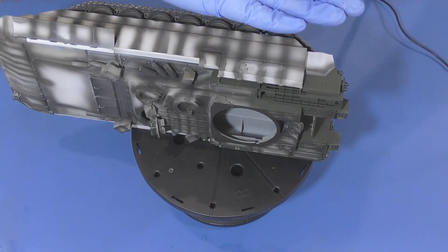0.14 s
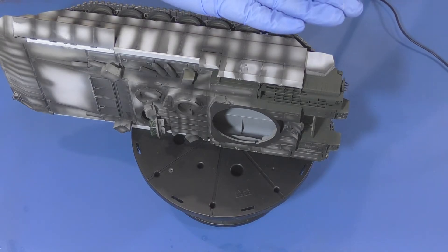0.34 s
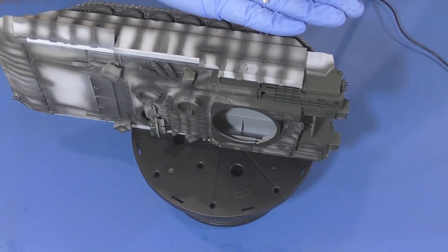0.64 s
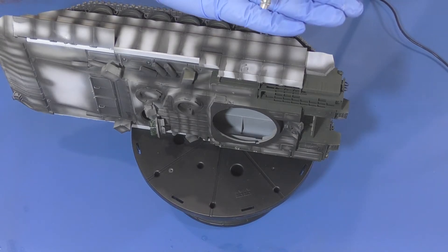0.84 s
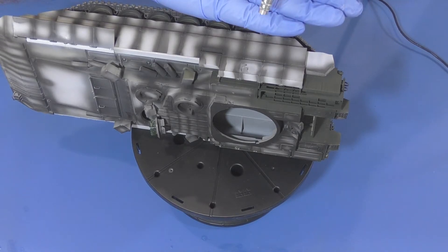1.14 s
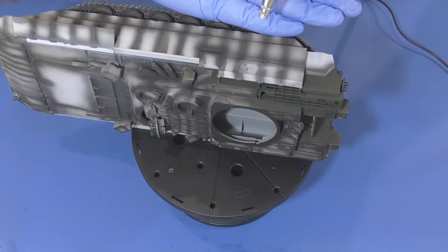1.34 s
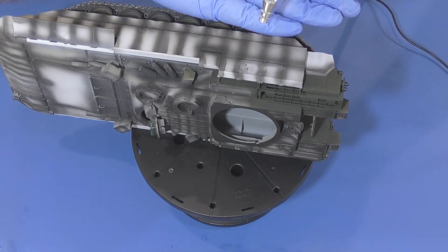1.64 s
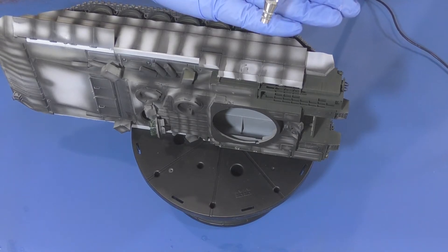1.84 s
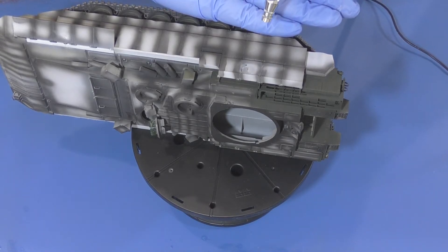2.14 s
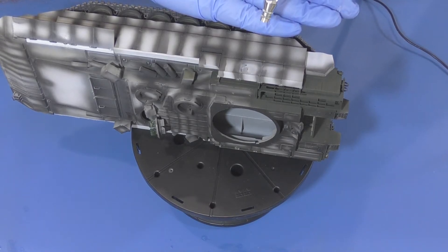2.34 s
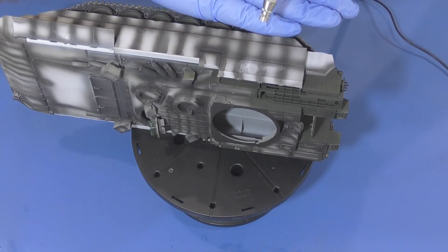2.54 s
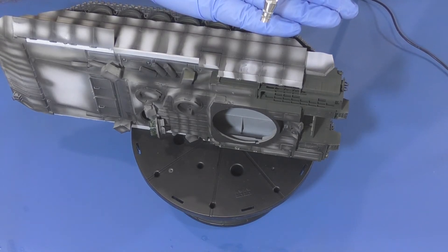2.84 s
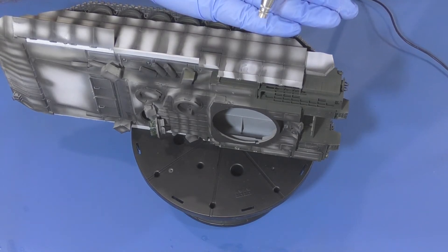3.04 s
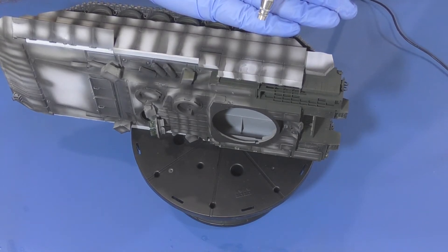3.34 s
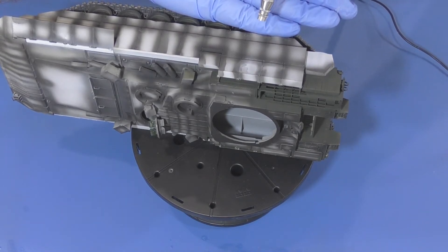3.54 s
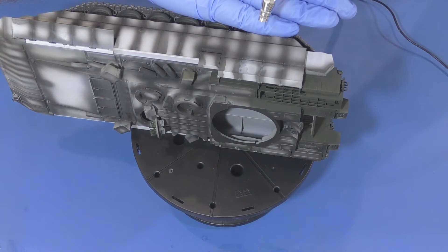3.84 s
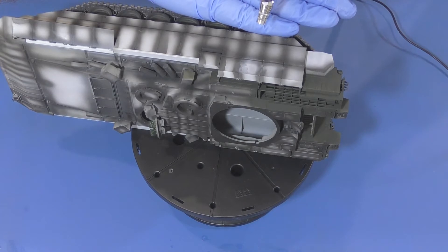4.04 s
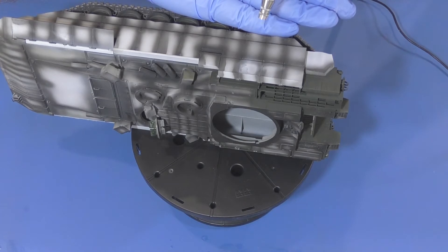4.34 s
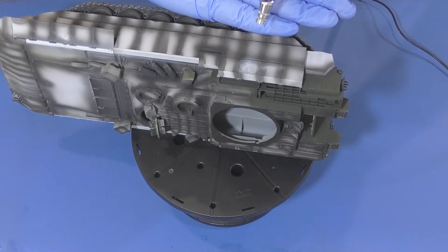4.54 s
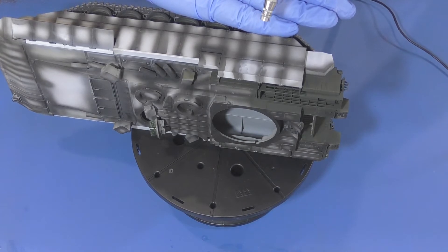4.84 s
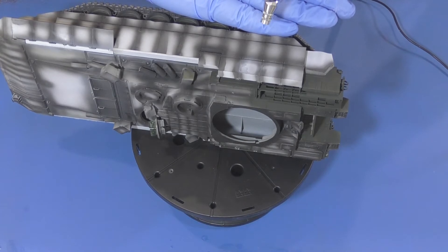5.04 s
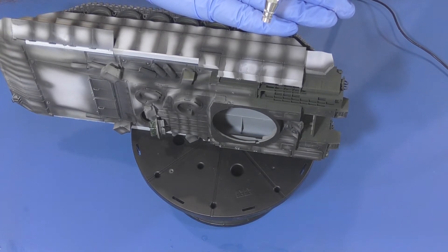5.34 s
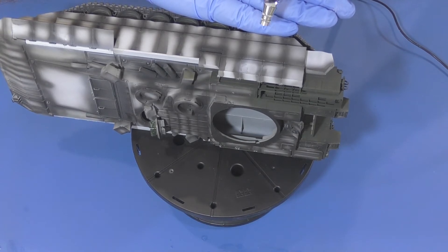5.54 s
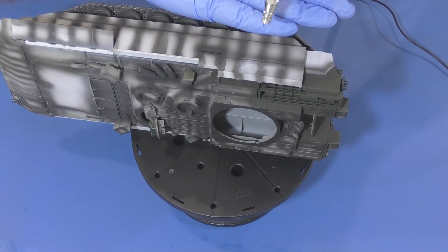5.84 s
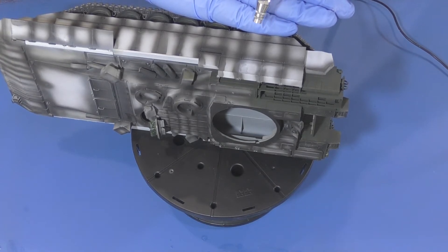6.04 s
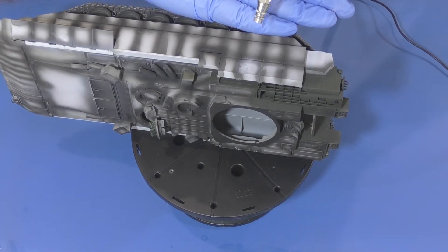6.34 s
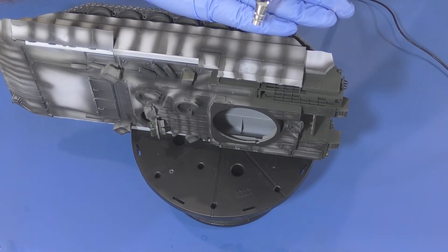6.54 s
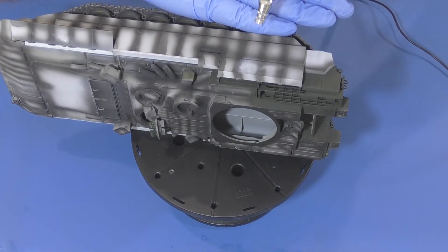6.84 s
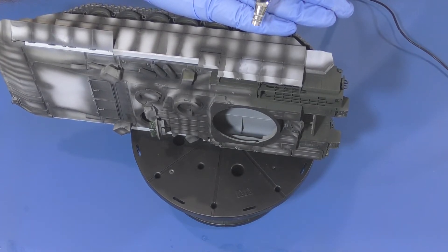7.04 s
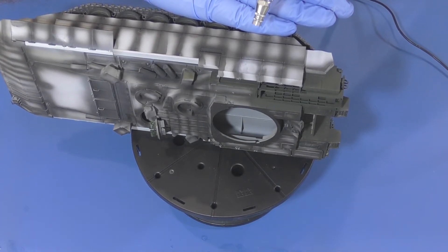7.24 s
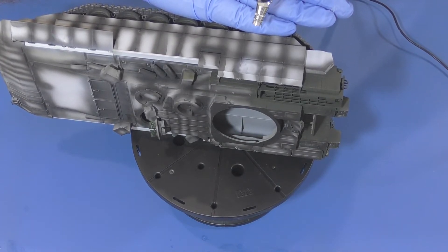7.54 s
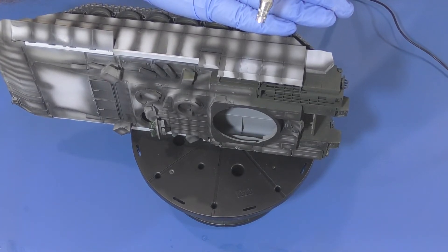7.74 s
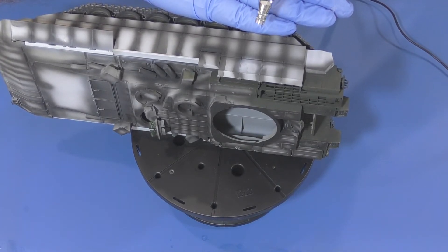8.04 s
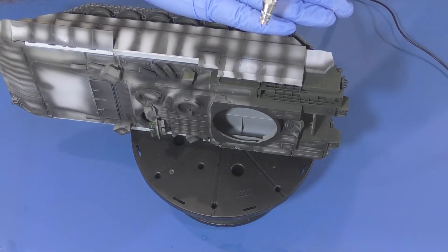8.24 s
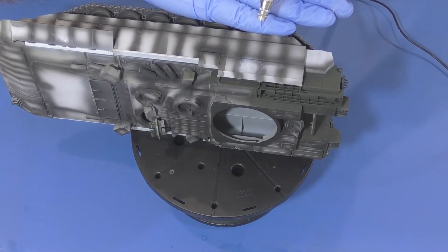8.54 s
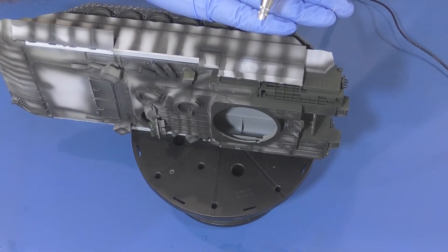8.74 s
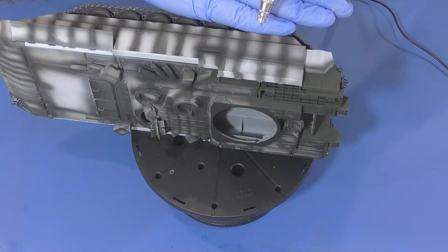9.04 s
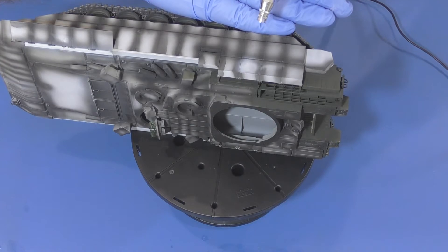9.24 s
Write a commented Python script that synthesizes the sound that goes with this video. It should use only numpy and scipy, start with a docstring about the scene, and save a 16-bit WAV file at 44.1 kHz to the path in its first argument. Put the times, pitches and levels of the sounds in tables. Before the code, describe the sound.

A closely heard airbrush paints a plastic model at a bench. After half a second of near silence comes one long breathy stroke, then fifteen shorter bursts that become quicker, crisper and brighter. Some end with a tiny spitting puff as the valve closes. Between them only short echoes, a faint low hum, soft fan noise and rare dull handling bumps remain. The sound is centred, dry and small-roomed.

```python
"""An airbrush paints a model on a workbench: one long stroke, then a row of short, fairly even ones.
Each press opens a jet of air, shaped noise that also rushes on the model's hollow hull a moment later.
Pulling the trigger back feeds paint: resonant noise, low for a thin flow and bright for a full one.
A small room answers with short decaying echoes; beneath lie a beating mains hum, a faint fan
and three soft handling bumps. Both channels carry the same sound."""
import sys
import numpy as np
from scipy import signal
from scipy.fft import rfft, irfft, next_fast_len
from scipy.io import wavfile
from scipy.ndimage import map_coordinates

SR = 44100
rng = np.random.default_rng(int(sys.argv[2]) if len(sys.argv) > 2 else 0)


def file_out(sig):
    """Save sig as 16-bit WAV at sys.argv[1]."""
    # one column per channel
    cols = np.atleast_2d(sig).T
    # limit, then scale
    lim = np.clip(cols, -1, 1)
    pcm = np.round(lim * 32767).astype(np.int16)
    wavfile.write(sys.argv[1], SR, pcm)


N = 414035


def amp(db):
    """Decibels to amplitude gain."""
    return 10 ** (np.asarray(db) / 20)


def unit(x):
    """Scale to rms 1."""
    return x / np.sqrt(np.mean(x ** 2) + 1e-20)


def clock():
    """Time of every sample in seconds."""
    return np.arange(N) / SR


def along(points, hz):
    """Interpolate (Hz, value) points on a log frequency axis."""
    point_hz, values = np.transpose(points)
    return np.interp(np.log(hz + 1), np.log(point_hz + 1), values)


def wobble(knots_per_s):
    """Smooth random curve: a spline through normal random knots."""
    knots = rng.standard_normal(int(N * knots_per_s / SR) + 4)
    return map_coordinates(knots, [clock() * knots_per_s])


def trailing(x, lag_s):
    """One-pole lag behind x."""
    keep = np.exp(-1 / (lag_s * SR))
    return signal.lfilter([1 - keep], [1, -keep], x)


def filtered(x, response):
    """Multiply the spectrum of x by a gain that depends on frequency, padded against wrap-around."""
    size = next_fast_len(N + SR // 2)
    hz = np.fft.rfftfreq(size, 1 / SR)
    return irfft(rfft(x, size) * response(hz), size)[:N]


def noise(spectrum, peaks=()):
    """Noise of rms 1: a broad spectrum with bell-shaped resonances added in dB."""
    def response(hz):
        lift_db = sum(db / (1 + (2 * (hz - centre_hz) / width_hz) ** 2)
                      for centre_hz, width_hz, db in peaks)
        return amp(along(spectrum, hz) + lift_db)
    return unit(filtered(rng.standard_normal(N), response))


# fan noise spectrum: freq_hz [Hz], density_db [relative dB per Hz]
FAN_SPECTRUM = [(12, -40), (22, -0.5), (45, -5.5), (90, -8), (170, -14), (330, -15), (600, -18.5),
                (1200, -22), (1370, -28.5), (2600, -33), (5000, -35), (8200, -35), (15500, -39.5)]


def fan(level_db=-50):
    """Shaped noise whose level drifts very slightly."""
    return amp(level_db + 0.19 * wobble(3)) * noise(FAN_SPECTRUM)


# mains hum partials: freq_hz [Hz], level_db [dB re the hum]
HUM_PARTIALS = [(120, 0.5), (240, -25), (360, -20.5)]
HUM_DB, BEAT_DEPTH = -55, 0.63  # stronger hum; amplitude share of the weaker hum beating against it
BEAT_PERIOD_S, BEAT_QUIET_S = 9.9, 5.7  # beat length and its quietest moment


def mains_hum():
    """Slightly unsteady sine partials wax and wane as two hums beat."""
    t = clock()
    phase_per_hz = 2 * np.pi * (t + .00006 * wobble(2))
    hum = np.zeros(N)
    for freq_hz, level_db in HUM_PARTIALS:
        start_phase = rng.uniform(0, 2 * np.pi)
        hum += amp(level_db) * np.sqrt(2) * np.sin(freq_hz * phase_per_hz + start_phase)
    weaker_hum = BEAT_DEPTH * np.exp(2j * np.pi * (t - BEAT_QUIET_S) / BEAT_PERIOD_S)
    return amp(HUM_DB) * np.abs(1 - weaker_hum) * hum


# soft hollow handling bumps: centre_s [s], level_db [dB, rms of the tone at the centre]
HANDLING_BUMPS = [(.50, -51.5), (4.76, -51), (8.589, -50.5)]


def bumps(ring_hz=226, width_s=.045):
    """One low note swells and fades under a Gaussian envelope at each bump."""
    total = np.zeros(N)
    for centre_s, level_db in HANDLING_BUMPS:
        age_s = clock() - centre_s
        swell = amp(level_db) * np.exp(-(age_s / width_s) ** 2)
        total += swell * np.sqrt(2) * np.sin(2 * np.pi * ring_hz * age_s)
    return total


# air past the barely cracked valve: time_s [s], air_db [dB]
VALVE_LEAK = [(.56, -80), (.62, -54), (.70, -50), (.76, -45), (.82, -91)]
# bare air jet spectrum: freq_hz [Hz], density_db [relative dB per Hz]
JET_SPECTRUM = [(300, -32), (1500, -6.5), (2600, -15.5), (3400, -13), (3900, -8), (4600, -13),
                (5400, -12.5), (6200, -6.5), (7900, 0), (9000, -3.5), (10200, -7.5), (12000, -5),
                (13300, -9.5), (15700, -15)]


def air_jet(air):
    """Turbulent air hisses at the nozzle, faintly at first through the barely cracked valve."""
    leak = amp(np.interp(clock(), *np.transpose(VALVE_LEAK), left=-120, right=-120))
    turbulence = amp(.6 * wobble(250))
    return (air + leak) * noise(JET_SPECTRUM) * turbulence


# trigger strokes: press_s [s], release_s [s], air_db [dB], pull_time_s [s], feed_length_s [s],
# paint_flow_db [dB, before the needle's motion], spit_db [dB, before the puff's shape]
TRIGGER_STROKES = [(0.703, 1.412, -28, .22, 0.43, -19, -41), (1.634, 2.049, -27.5, 0.0072, 0.22, -25, -38),
                   (2.285, 2.616, -26.5, 0.034, 0.21, -16, -38),
                   (2.878, 3.22, -27.6, .006, 0.14, -15.5, -42),
                   (3.447, 3.743, -28.5, 0.013, 0.16, -16.5, -41),
                   (3.996, 4.301, -27.7, .008, 0.12, -15, -29), (4.567, 4.856, -29, .006, 0.11, -15.2, -45),
                   (5.056, 5.3, -28.5, 0.0052, 0.12, -14.5, -45),
                   (5.542, 5.809, -26, 0.0066, 0.086, -14.5, -21),
                   (6.086, 6.362, -27.5, 0.012, .15, -15.5, -41),
                   (6.582, 6.814, -26.5, 0.0049, 0.11, -15, -31), (7.078, 7.324, -26, .01, 0.059, -13, -25),
                   (7.574, 7.862, -27, .006, 0.085, -14.5, -22.5),
                   (8.098, 8.296, -26, .006, 0.061, -13.5, -28.5),
                   (8.607, 8.831, -27.5, 0.0051, 0.089, -14.5, -31),
                   (9.15, 9.337, -27, .006, 0.051, -13, -32.5)]
VALVE_OPEN_S, VALVE_CLOSE_S = 0.02, 0.0044  # shortest opening; spring snapping the valve shut
GENTLE_PRESS = 0.49  # opening time over pull time: a slow pull opens the valve slowly too
EASE_STEEPNESS = 6.8  # how abruptly the needle slides forward again


def trigger():
    """Valve opening, air and paint flow: air opens, the needle pulls back, then eases forward."""
    t = clock()
    valve, air, paint = np.zeros((3, N))
    for press_s, release_s, air_db, pull_s, feed_s, paint_db, _ in TRIGGER_STROKES:
        opening_s = max(VALVE_OPEN_S, GENTLE_PRESS * pull_s)
        shut_s = release_s + VALVE_CLOSE_S
        held = (t > press_s) & (t < shut_s)
        age_s = t[held] - press_s
        gate = np.interp(t[held], [press_s, press_s + opening_s, release_s, shut_s], [0, 1, 1, 0])
        pulled_back = 1 - np.exp(-age_s / pull_s)
        needle = pulled_back / (1 + (age_s / feed_s) ** EASE_STEEPNESS)
        valve[held] += gate
        air[held] += gate * amp(air_db)
        paint[held] += gate * needle * amp(paint_db)  # paint is only drawn while air flows
    return valve, air, paint


# air striking the model: freq_hz [Hz], density_db [relative dB per Hz]
RUSH_SPECTRUM = [(100, -27), (220, -16.5), (340, -13), (430, -4.5), (620, -5), (900, -10.5), (1100, -3.5),
                 (1550, -12.5), (1850, -8.5), (2400, -16), (4500, -18.5), (9000, -61)]
# hollows of the model's hull: centre_hz [Hz], width_hz [Hz], lift_db [dB]
HULL_RESONANCES = [(488, 63, 2.1), (721, 138, 10.7), (969, 33, 8.2), (1128, 91, 3.7), (1360, 110, 3.6),
                   (1773, 52, 5.9)]
RUSH_DB = -30.5  # same for every stroke, before paint softens it


def air_on_model(valve, paint, travel_s=0.0032, soften_db=14, recovery_s=0.027):
    """The jet rushes on the model after a travel delay; a load of paint softens the rush."""
    arriving = np.interp(clock() - travel_s, clock(), valve)
    load = trailing(np.sqrt(paint), recovery_s)
    level = amp(RUSH_DB - soften_db * load + 0.93 * wobble(22))
    return arriving * level * noise(RUSH_SPECTRUM, HULL_RESONANCES)


# paint tearing into mist: freq_hz [Hz], density_db [relative dB per Hz]
MIST_SPECTRUM = [(400, -36), (1200, -24), (2300, -8.5), (3000, -8), (4000, -9), (5500, -10.5), (6800, -5),
                 (7800, 4), (8700, -5), (10400, -11), (11800, -7), (13300, -14.5), (15700, -18.5)]
# resonances around the nozzle: centre_hz [Hz], width_hz [Hz], lift_db [dB]
NOZZLE_RESONANCES = [(1800, 47, 5.6), (2680, 100, 3.66), (3233, 260, 9.7), (4690, 290, 6.4),
                     (6220, 340, 8.9), (7300, 400, 2.5), (7850, 210, 2.4), (8210, 254, 7), (8960, 227, 6.2),
                     (9940, 310, 8.4), (11340, 320, 5.9), (12400, 350, 3), (14000, 350, 3.5)]
# growth of each band with the paint: centre_hz [Hz], flow_power [exponent]
BAND_GROWTH = [(1500, 0.69), (2500, 0.83), (4300, 0.79), (6200, 1.3), (7900, 1.12), (9100, 1.44),
               (12000, 1.13)]


def paint_mist(paint, full_db=-14, mist_db=-0.94, sputter_db=1.0, flutter_db=0.37,
               drying_s=0.018, coarse_hz=3500):
    """Paint breaks up unevenly; a thin flow hisses low, a full one sizzles bright."""
    mist = noise(MIST_SPECTRUM, NOZZLE_RESONANCES)
    flow = paint / amp(full_db)
    film = np.maximum(flow, trailing(flow, drying_s))  # wet needle holds the low hiss a little longer
    centres_hz, powers = np.transpose(BAND_GROWTH)
    spray = np.zeros(N)
    for centre_hz, power, weights in zip(centres_hz, powers, np.eye(len(BAND_GROWTH))):
        crossfade = np.c_[centres_hz, weights]  # 1 at this band's centre, 0 at the others
        band = filtered(mist, lambda hz: along(crossfade, hz))
        drive = film if centre_hz < coarse_hz else flow
        spray += band * drive ** power
    breakup = unit(amp(sputter_db * wobble(500) + flutter_db * wobble(70)))
    return amp(full_db + mist_db) * breakup * spray


# closing spit spectrum: freq_hz [Hz], density_db [relative dB per Hz]
SPIT_SPECTRUM = [(300, -15), (700, -5), (2000, 6), (4200, 6), (7000, -5), (14000, -23)]
SPIT_LEAD_S = .03  # the needle tip clears this long before release


def spits(rise_s=0.0042, fade_s=0.0087):
    """Paint left on the needle tip blows off in a short noise puff just before the valve shuts."""
    age_s = np.arange(SR // 8) / SR
    puff = (1 - np.exp(-age_s / rise_s)) * np.exp(-age_s / fade_s)
    level = np.zeros(N + len(puff))
    for _, release_s, *_, spit_db in TRIGGER_STROKES:
        start = round((release_s - SPIT_LEAD_S) * SR)
        level[start:start + len(puff)] += amp(spit_db) * puff
    return level[:N] * noise(SPIT_SPECTRUM)


def airbrush(venting_s=0.003):
    """One trigger drives both the air and the paint."""
    valve, air, paint = trigger()
    blowing = trailing(valve > 0, venting_s)  # the mist stops with the air
    mist = blowing * paint_mist(paint)
    return air_jet(air) + air_on_model(valve, paint) + mist + spits()


# room decay: freq_hz [Hz], t60_s [s]
ROOM_DECAY = [(200, 0.28), (1000, 0.18), (4000, 0.19), (8000, 0.17), (15000, 0.18)]


def wall_tail(gap_s=.002):
    """Echo tail of energy 1: noise decaying at each frequency's own t60, after a short gap."""
    hz, t, grid = signal.stft(rng.standard_normal(SR // 2), SR, nperseg=256)
    decay = amp(-60 * t / along(ROOM_DECAY, hz)[:, None])
    tail = signal.istft(grid * decay, SR, nperseg=256)[1]
    return np.pad(tail / np.linalg.norm(tail), (int(gap_s * SR), 0))


def room(x, wet_db=-5.0, count=6):
    """The restless plume feeds several wall tails in ever-changing shares of constant total power."""
    shares = np.array([.35 + wobble(45) for _ in range(count)])
    shares /= np.linalg.norm(shares, axis=0)
    echo = sum(signal.fftconvolve(x * share, wall_tail())[:N] for share in shares)
    return (x + amp(wet_db) * echo) / np.hypot(1, amp(wet_db))


def scene():
    """The airbrush in its room, bumps, fan and hum, alike in both channels."""
    mono = room(airbrush()) + bumps() + fan() + mains_hum()
    return np.array([mono, mono])


TOP_HZ = 15800


def record(dry):
    """Cut everything from the band limit up."""
    return np.array([filtered(channel, lambda hz: hz < TOP_HZ) for channel in dry])


dry = scene()
out = record(dry)
file_out(out)
```